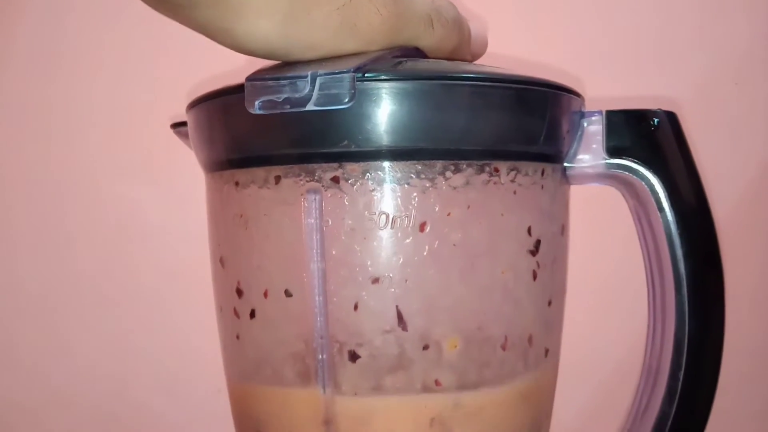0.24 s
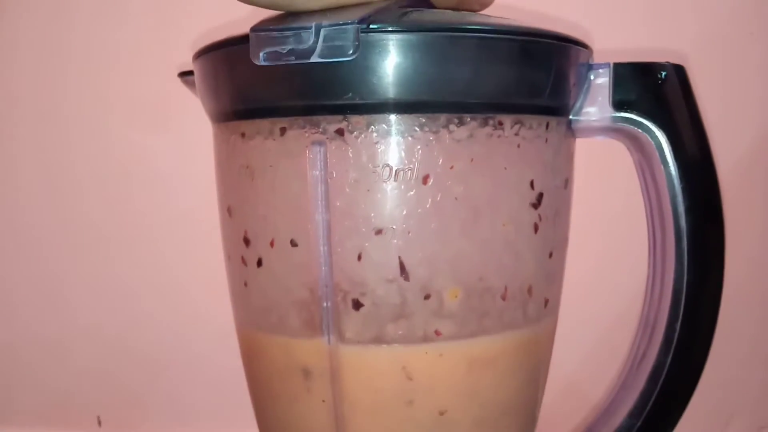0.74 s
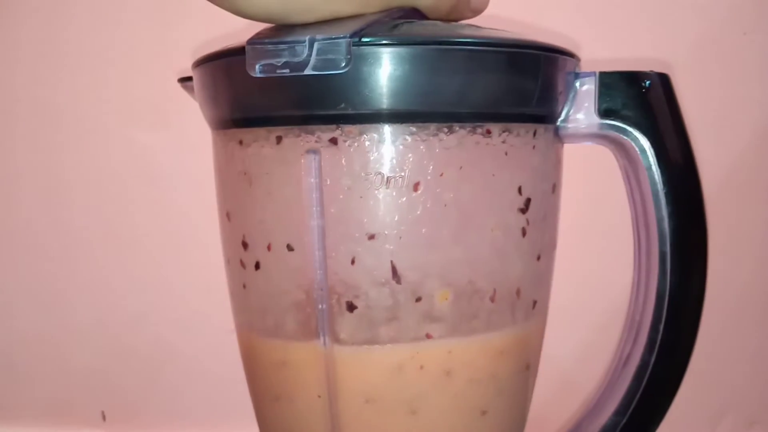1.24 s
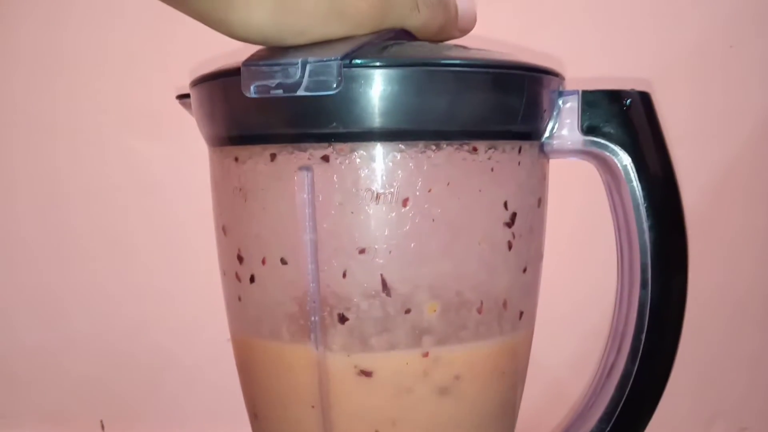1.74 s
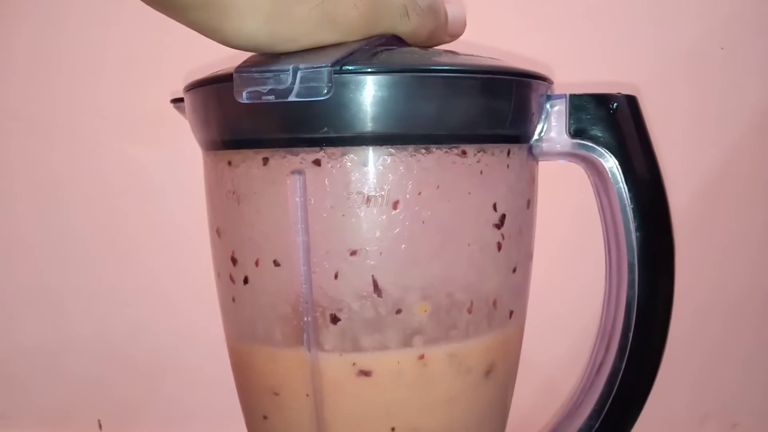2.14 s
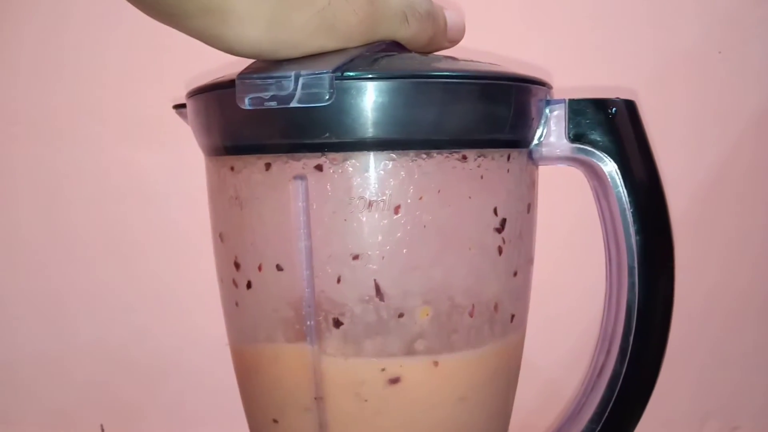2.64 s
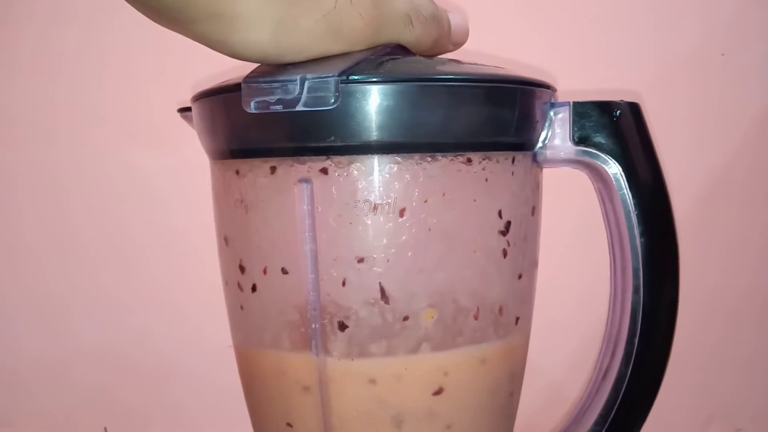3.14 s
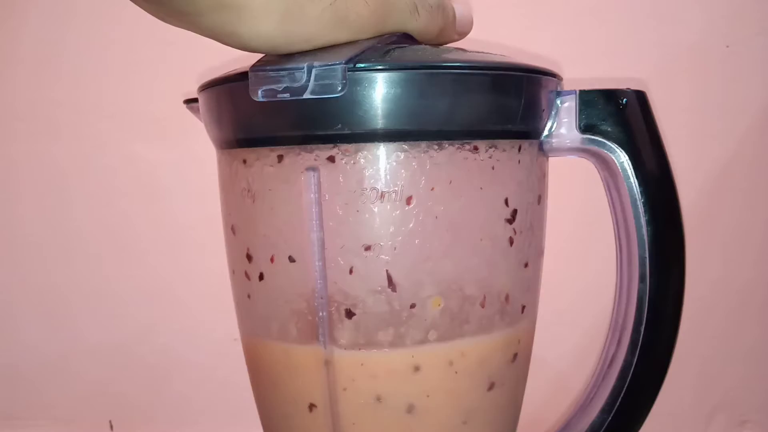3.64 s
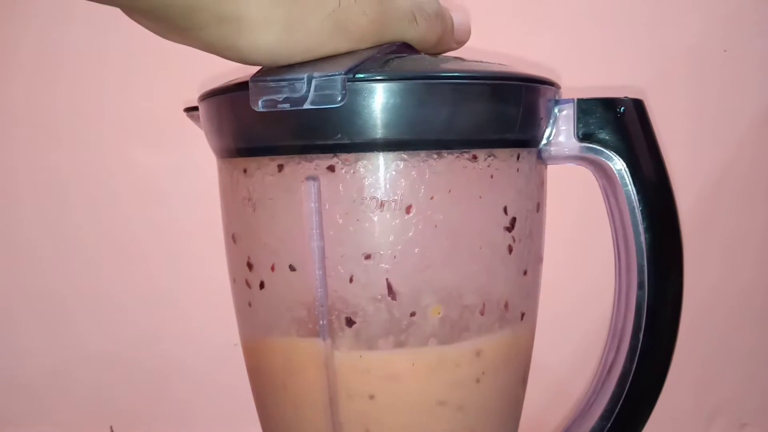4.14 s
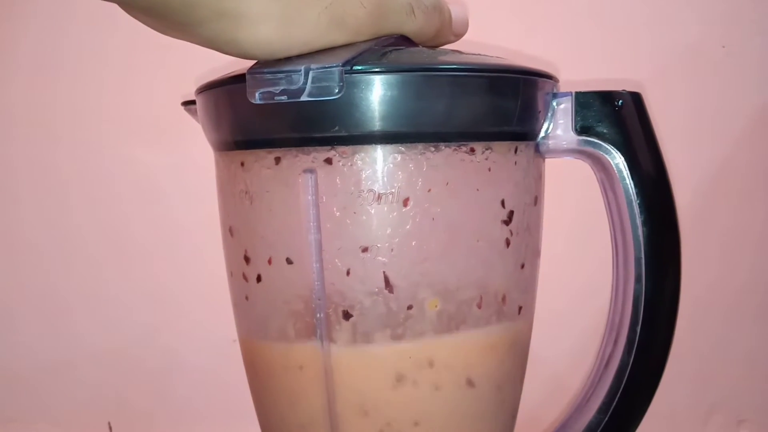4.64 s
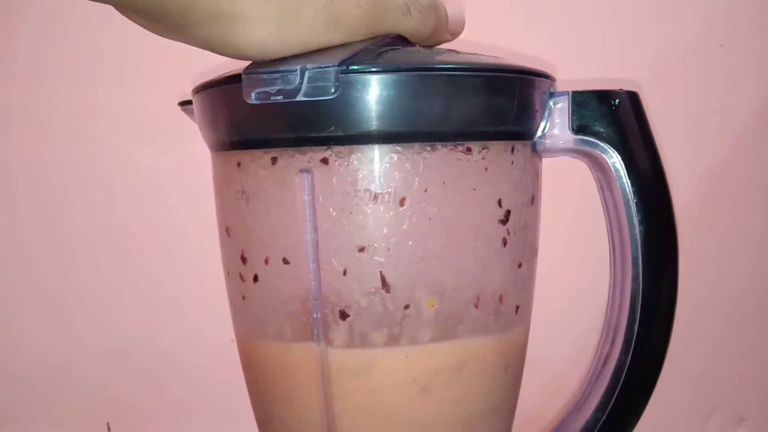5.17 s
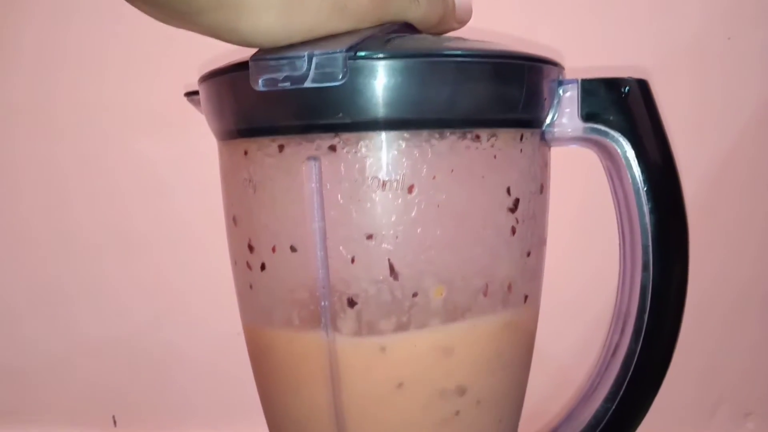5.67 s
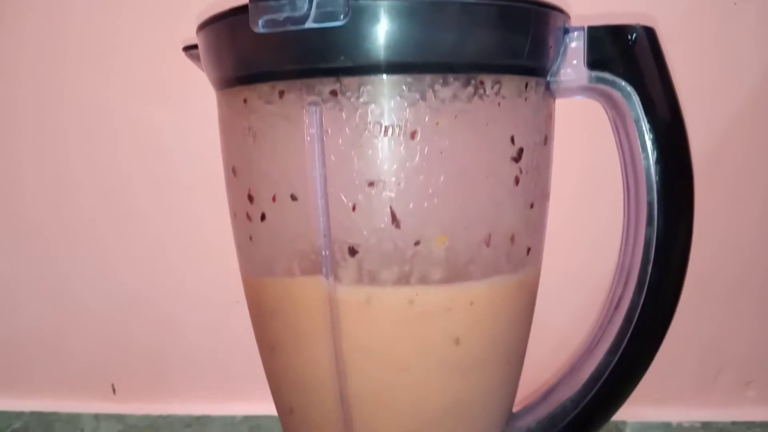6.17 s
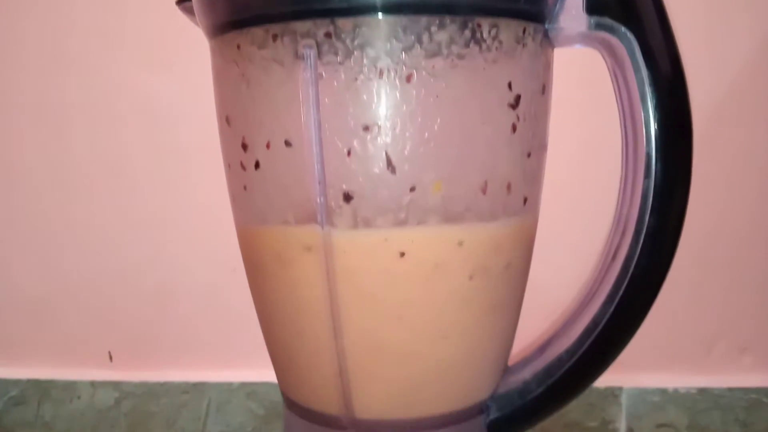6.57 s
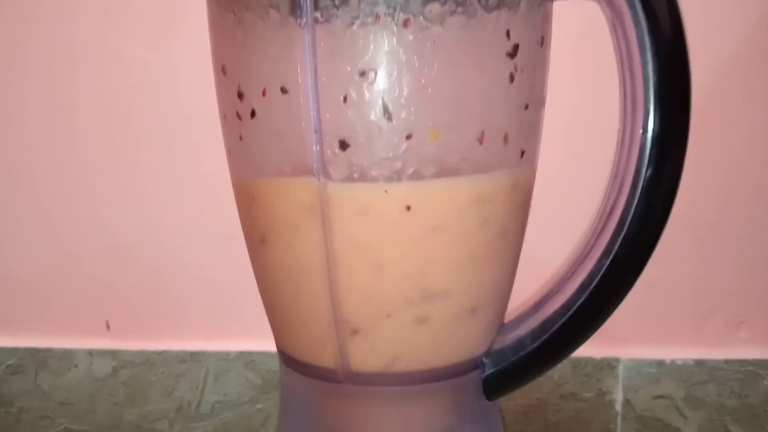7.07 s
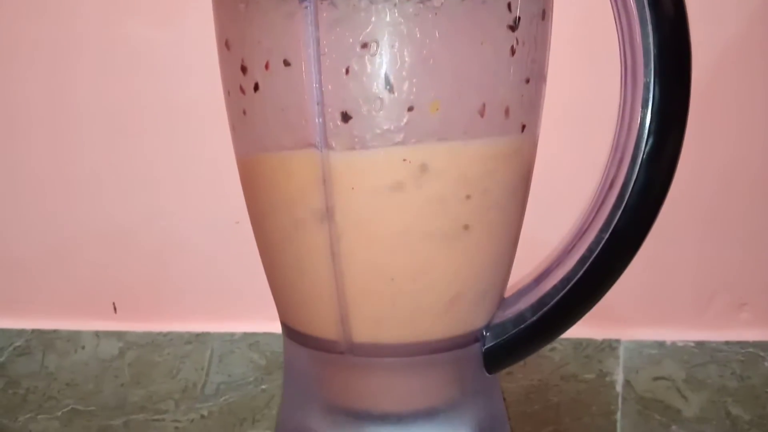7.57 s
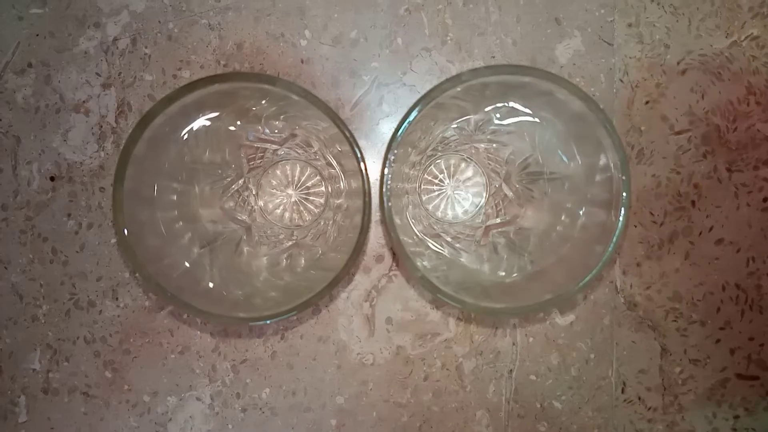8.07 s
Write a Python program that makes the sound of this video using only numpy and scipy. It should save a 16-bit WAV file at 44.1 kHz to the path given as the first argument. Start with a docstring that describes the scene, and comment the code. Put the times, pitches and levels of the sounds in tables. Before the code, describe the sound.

Close kitchen blender humming and churning fruit with ticking ice, stopping abruptly before a short, soft machine drone.

```python
"""A jug blender purees fruit and ice close by in a kitchen. Its motor hums and whines at about
187 turns a second. Bubbles collapse behind the blades, so the pulp churns and the plastic jug rings,
and bits of ice tick against the wall. The sound breaks off, and after a short silence a duller,
quieter machine drone swells in."""
import sys
import numpy as np
from scipy import signal
from scipy.fft import rfft, irfft, next_fast_len
from scipy.io import wavfile
from scipy.ndimage import map_coordinates

SR = 44100
rng = np.random.default_rng(int(sys.argv[2]) if len(sys.argv) > 2 else 0)


def file_out(sig):
    """Save sig as 16-bit WAV at sys.argv[1]."""
    # one column per channel
    cols = np.atleast_2d(sig).T
    # limit, then scale
    lim = np.clip(cols, -1, 1)
    pcm = np.round(lim * 32767).astype(np.int16)
    wavfile.write(sys.argv[1], SR, pcm)


N = 366471

# The motor slows and recovers as its load changes: time_s, turns_per_s
MOTOR_SPEED = [(0.0, 186.28), (0.61, 187.78), (0.81, 186.95), (1.3, 188.2), (1.54, 186.51), (1.78, 185.95),
               (1.82, 187.3), (2.18, 188.57), (3.0, 186.73), (3.1, 187.29), (3.72, 185.94), (4.16, 185.45),
               (4.45, 187.35), (4.99, 188.8), (5.39, 186.75), (5.84, 187.53), (6.37, 186.28), (7.3, 186.85),
               (7.65, 184.72)]
# Weaker tones of the motor shaft: cycles_per_turn, level_db
SHAFT_TONES = [(2, -54), (3, -45), (4, -46), (6, -48), (7, -46), (23, -58), (35, -60), (36, -53), (47, -69),
               (53, -64), (60, -73)]
# The motor's magnetic hum: pitch_hz, level_db
MAGNETIC_HUM = [(49, -68.5), (100, -56)]
# Slow swells and dips of the three main motor tones: middle_s, length_s, change_db
SHAFT_TONE_SWELLS = [(2.25, .5, 3), (4.6, 2.5, 5)]
BLADE_TONE_SWELLS = [(.15, 1.6, 4), (2.25, 1.1, -7), (3.25, 1.1, 6), (4.5, 1, -5.5)]
WHINE_TONE_SWELLS = [(.45, .5, 3.5), (3.15, .3, -4), (3.76, .35, 4), (4.17, .4, 3), (5.92, .5, 3),
                     (6.6, .7, -5), (7.4, .5, 2.5)]
# Ringing notes of the full jug, then thin ones of its wall and blades: pitch_hz, width_hz, relative_db
JUG_NOTES = [(315.7, 18, -11), (472, 39, -12), (603.3, 20, -6), (683, 13, -12), (781, 41, -11),
             (970.3, 25.7, 1.5), (1009, 16, -11), (1164.6, 43, 0), (1217, 24, -8.5), (1330, 25, 3.5),
             (1541, 28, -6), (1663, 100, -1.5), (1876, 27, 3.5), (2166, 51, -18)]
WALL_NOTES = [(3470, 110, 0.5), (3770, 87, 0.5), (5500, 110, -6.5), (6210, 100, -2.5), (7150, 130, 1.5),
              (7490, 90, -0.5), (8320, 110, -8.5), (11420, 230, -14), (12600, 140, -14), (14550, 220, -12)]
# Big pieces of fruit meet the blades and the jug booms: middle_s, length_s, change_db
JUG_BOOMS = [(.47, 0.18, 2), (2.42, .16, 1.5), (3.62, 0.14, 1.5), (3.93, .25, 1.5), (4.69, .16, 3),
             (6.13, .25, 2), (7.2, 0.11, 2.5), (7.43, 0.29, 2)]
# The colour of each noise, or how strong it is from low to high: pitch_hz, relative_db
PULP_COLOUR = [(25, -45), (70, -30), (110, -8.5), (250, -7), (520, -6), (800, 2), (1500, 3), (2200, -0.5),
               (2700, -4.5), (3500, -3.5), (4200, -7), (5000, -13), (7000, -26.5), (12000, -55)]
SPRAY_COLOUR = [(1000, -26), (3000, -3), (4200, -5.5), (5000, -8.5), (6200, 0), (6500, 0), (7200, 0.5),
                (8000, -5.5), (9300, -17.5), (10400, -18.5), (11600, -16), (13000, -17.5), (15500, -14.5)]
CRACK_COLOUR = [(1500, -31), (4000, -3), (7200, 10.5), (9500, -9.5), (15500, -23.5)]
KNOCK_COLOUR = [(300, -18.5), (1200, 1.5), (2700, -1), (3800, 2), (6000, -15.5), (12000, -42)]
SNAP_COLOUR = [(5000, -24.5), (9000, -9.5), (12000, -2), (15500, -1)]
DRONE_COLOUR = [(30, -16), (100, -10), (170, 1), (260, 1), (370, 0), (430, -4), (600, -5), (760, -4.5),
                (1250, -6.5), (1700, -11), (2100, -13.5), (3600, -22), (5500, -31.5), (7300, -22),
                (9500, -36), (13000, -35), (15500, -47)]
# Ice hits the blades and wall (levels are relative): start_s, crack_db, knock_db, snap_db
ICE_HITS = [(0.3905, -17, -24, -32), (1.71, -13.5, -19, -37), (1.7144, -17, -21, -32),
            (1.8791, -12.5, -19, -35), (2.154, -8, -27, -31), (2.389, -19, -19, -41),
            (2.8452, -31, -32, -30.5), (2.856, -19, -18.5, -43), (2.9897, -13, -26, -38),
            (3.0594, -24, -22, -44), (3.5463, -24, -20, -42), (4.6039, -8.5, -22.5, -39),
            (5.019, -12, -23, -40), (5.4173, -18.5, -22, -41), (5.7544, -24, -31, -34),
            (6.0965, -10.5, -26, -33), (6.102, -16.5, -28, -34), (6.787, -9, -25, -41),
            (7.1995, -21.5, -22.5, -32), (7.384, -17, -28, -33)]
# How long the kitchen's echo takes to fade by 60 dB: pitch_hz, fade_s
ECHO_FADES = [(200, .3), (2000, .25), (12000, 0.053)]
# Tones in the drone, set against its rushing noise: pitch_hz, relative_db
DRONE_NOTES = [(320, -11.5), (368, -12), (752, -17), (1240, -20), (2070, -21)]
# Faint ticks in the drone (levels are relative): start_s, crack_db, knock_db, snap_db
DRONE_HITS = [(7.974, -54, -58, -76), (8.111, -41, -52, -64)]

USUAL_TURNS_PER_S = 187  # "strain" is how far the motor falls below this speed
# Sounds that follow the strain: base_db, change_db for each turn a second lost
SHAFT_HUM, BLADE_TONE, WHINE, WHINE_OCTAVE = (-48.2, -.6), (-36.5, 1.2), (-43.5, 2.35), (-62, 1.8)
CHURN, SPRAY = (-24, 0.14), (-33, .1)
OPENING_DB, OPENING_S = 10.5, 2.6  # the whine starts this much louder and settles over this time
COARSE_DB, COARSE_S = 1.45, .8  # the churning starts louder and eases as the fruit breaks up
NEAR_BASE_S, NEAR_BASE_DB = 6.0, 8  # the whine's overtones grow as we sink toward the motor base
STOP_S, DRONE_START_S = 7.654, 7.824
HUM_GROWS_S, HUM_DB_PER_S = 8.17, 75  # when and how fast the drone's low hum grows


def amp(db):
    """Turn decibels into a number to multiply a sound by."""
    return 10 ** (np.asarray(db) / 20)


def unit(x):
    """Scale a sound to an average strength (rms) of 1."""
    return x / np.sqrt(np.mean(x ** 2) + 1e-20)


def clock():
    """The time of each sample in seconds."""
    return np.arange(N) / SR


def along(points, hz):
    """Read a table of (pitch_hz, value) rows at any pitch, with octaves evenly spaced."""
    pitches, values = np.transpose(points)
    return np.interp(np.log(hz + 1), np.log(pitches + 1), values)


def ramp(start_s, length_s):
    """A straight rise from 0 to 1."""
    return np.clip((clock() - start_s) / length_s, 0, 1)


def swells(rows):
    """Smooth bumps and dips in level, in dB."""
    return sum(db * np.cos(np.pi * np.clip((clock() - middle_s) / length_s, -.5, .5)) ** 2
               for middle_s, length_s, db in rows)


def wobble(per_s):
    """A smooth curve through this many random values a second."""
    values = rng.standard_normal(int(N * per_s / SR) + 4)
    steps = np.arange(0, N, 16)
    return np.interp(np.arange(N), steps, map_coordinates(values, [steps * per_s / SR]))


def filtered(x, gain_at):
    """Turn each pitch in a sound up or down by gain_at(hz)."""
    size = next_fast_len(N + SR // 2)
    return irfft(rfft(x, size) * gain_at(np.fft.rfftfreq(size, 1 / SR)), size)[:N]


def coloured(x, colour):
    """Shape a noise with a colour table, at strength 1."""
    return unit(filtered(x, lambda hz: amp(along(colour, hz))))


def strained(setting, strain):
    """The level in dB of a sound that changes as the motor labours."""
    base_db, change_db = setting
    return base_db + change_db * strain


def motor(angle, strain):
    """Tones follow the shaft. Blades and whine grow under strain; the swirling load makes all flutter."""
    def tone(per_turn, db, flutter_db):
        phase = per_turn * angle + 0.14 * wobble(18)
        return np.sqrt(2) * amp(db + flutter_db * (wobble(8) + wobble(40))) * np.sin(phase)
    shaft_db = strained(SHAFT_HUM, strain) + swells(SHAFT_TONE_SWELLS)
    blade_db = strained(BLADE_TONE, strain) + swells(BLADE_TONE_SWELLS)
    whine_db = strained(WHINE, strain) + swells(WHINE_TONE_SWELLS)
    whine_db += OPENING_DB * (1 - ramp(0, OPENING_S))
    octave_db = strained(WHINE_OCTAVE, strain) + NEAR_BASE_DB * ramp(NEAR_BASE_S, length_s=.5)
    shaft = tone(per_turn=1, db=shaft_db, flutter_db=2.0)
    blades = tone(per_turn=5, db=blade_db, flutter_db=1.1)
    whine = tone(per_turn=24, db=whine_db, flutter_db=1.6)  # the motor's spinning electric contacts
    overtones = tone(per_turn=48, db=octave_db, flutter_db=1.0)
    overtones += tone(per_turn=72, db=octave_db - 4.5, flutter_db=0.5)
    weak_tones = sum(tone(per_turn, db, flutter_db=1.4) for per_turn, db in SHAFT_TONES)
    return shaft + blades + whine + overtones + weak_tones


def magnetic_hum():
    """The electric supply makes the motor hum low, whatever its speed."""
    return sum(np.sqrt(2) * amp(db) * np.sin(2 * np.pi * hz * clock() + .25 * wobble(12))
               for hz, db in MAGNETIC_HUM)


def pops(per_s, spread_db):
    """Collapsing bubbles: tiny clicks of uneven size at random moments."""
    happens = rng.random(N) < per_s / SR
    size = amp(spread_db * rng.standard_normal(N))
    return unit(happens * size * rng.choice([-1, 1], N))


def ringing(x, notes, dull_above_hz):
    """A shaken part rings at its own notes, at strength 1; thick pulp dulls the high ones."""
    def gain_at(hz):
        peaks = sum(amp(db) * 1j * hz * width / (pitch ** 2 - hz ** 2 + 1j * hz * width)
                    for pitch, width, db in notes)
        return peaks / (1 + (hz / dull_above_hz) ** 4)
    return unit(filtered(x, gain_at))


def churning(angle, strain):
    """Bubbles collapse behind the blades, stirring up pulp and spray and shaking the jug."""
    churn_db = strained(CHURN, strain) + COARSE_DB * np.exp(-clock() / COARSE_S)
    spray_db = strained(SPRAY, strain)
    lumps = amp(0.28 * wobble(7.3) + 0.5 * wobble(35) + 0.68 * wobble(170))  # fruit passes the blades
    beat = 1 + .12 * np.cos(angle) + .13 * np.cos(2 * angle)  # once and twice a turn
    jug_ring = ringing(pops(6000, spread_db=2.5) * beat * lumps, JUG_NOTES, dull_above_hz=3000)
    jug = amp(churn_db - 2.0 + swells(JUG_BOOMS)) * jug_ring
    pulp = amp(churn_db - 3.5) * coloured(pops(14000, spread_db=3.5) * beat * lumps, PULP_COLOUR)
    fizz = pops(16000, spread_db=3) * lumps * amp(0.32 * wobble(40) + .8 * wobble(220))
    spray = amp(spray_db) * coloured(fizz, SPRAY_COLOUR)
    wall_ring = ringing(pops(9000, spread_db=3) * lumps, WALL_NOTES, dull_above_hz=19000)
    wall = amp(spray_db - 5.0) * wall_ring
    crackle = amp(spray_db - 17.5) * coloured(pops(900, spread_db=4.5), SNAP_COLOUR)  # sparse, bright sparks from the motor's brushes
    return jug + pulp + spray + wall + crackle


def ticks(hits, fade_s):
    """Each hit is a short crack, a duller knock and a bright snap, fading 60 dB in fade_s."""
    bursts = np.zeros((3, N))
    t = np.arange(SR // 10) / SR
    shape = amp(-60 * t / fade_s) * (1 - np.exp(-t / 0.00036))
    for start_s, crack_db, knock_db, snap_db in hits:
        start = round(start_s * SR)
        sizes = amp([crack_db - 8.0, knock_db + 3, snap_db + 5])
        bursts[:, start:start + len(t)] += np.outer(sizes, shape[:N - start])
    return sum(burst * coloured(rng.standard_normal(N), colour)
               for burst, colour in zip(bursts, (CRACK_COLOUR, KNOCK_COLOUR, SNAP_COLOUR)))


def ice_crumbs(count):
    """Small crumbs of ice tick at random moments, most of them faintly."""
    when, size, sharpness = rng.random((count, 3)).T
    crack_db = -30 + 8 * size ** 3
    knock_db = crack_db - 3.5
    snap_db = crack_db - 21.5 + 9 * sharpness
    return ticks(np.transpose([when * STOP_S, crack_db, knock_db, snap_db]), fade_s=.02)


def kitchen_echo(x):
    """The walls send back a short echo whose highs fade first."""
    hz, t, noise = signal.stft(rng.standard_normal(SR // 2), SR, nperseg=256)
    fade = amp(-60 * t / along(ECHO_FADES, hz)[:, None])
    tail = signal.istft(noise * fade, SR, nperseg=256)[1]
    delayed = np.pad(x, (SR // 200, 0))
    return signal.fftconvolve(delayed, tail / np.linalg.norm(tail))[:N]


def ice_ping(start_s, pitch_hz, level_db, fade_s):
    """One hard chip of ice rings briefly as it strikes."""
    t = np.maximum(clock() - start_s, 0)
    return amp(level_db - 60 * t / fade_s) * np.sin(2 * np.pi * pitch_hz * t)


def machine_drone():
    """A dull rush with wavering tones and two faint ticks swells in; its low hum grows at the end."""
    def tone(hz, db):
        phase = 2 * np.pi * hz * clock()
        return np.sqrt(2) * amp(db + 1.5 * wobble(9)) * np.sin(phase + .5 * wobble(15))
    swell = .08 + .92 * ramp(DRONE_START_S, length_s=0.27)
    hum_db = -11 + HUM_DB_PER_S * np.maximum(clock() - HUM_GROWS_S, 0)
    rush = coloured(rng.standard_normal(N), DRONE_COLOUR)
    tones = tone(hz=153, db=hum_db) + sum(tone(hz, db) for hz, db in DRONE_NOTES)
    return amp(-43.5) * swell * (rush + tones) + ticks(DRONE_HITS, fade_s=.035)


def scene():
    """The blender, a gap, then the drone; the same in both ears."""
    speed = np.interp(clock(), *np.transpose(MOTOR_SPEED))
    strain = USUAL_TURNS_PER_S - speed
    speed += .16 * wobble(14)  # lumps brake the blades for a moment
    angle = 2 * np.pi * np.cumsum(speed) / SR  # how far the shaft has turned
    ice = ticks(ICE_HITS, fade_s=0.026) + ice_crumbs(count=110)
    ice += ice_ping(start_s=6.0965, pitch_hz=5850, level_db=-23, fade_s=.07)
    blender = motor(angle, strain) + magnetic_hum() + churning(angle, strain)
    blender += ice + amp(-7.5) * kitchen_echo(ice)
    blender_on = np.clip((STOP_S - clock()) / .001, 0, 1)
    drone_on = ramp(DRONE_START_S, length_s=.01)
    mono = blender * blender_on + machine_drone() * drone_on
    return np.array([mono, mono])


def record(dry):
    """The microphone loses the very highest treble."""
    def treble_cut(hz, above_hz=15720):
        return amp(-np.maximum(hz - above_hz, 0) ** 2 / 1200)
    return np.array([filtered(channel, treble_cut) for channel in dry])


dry = scene()
out = record(dry)
file_out(out)
```